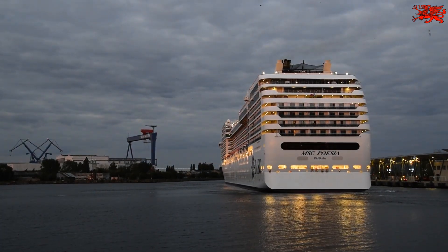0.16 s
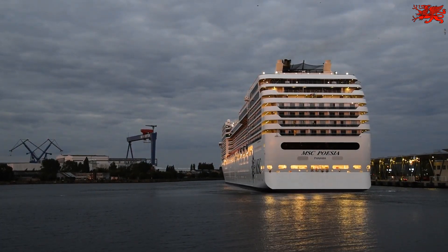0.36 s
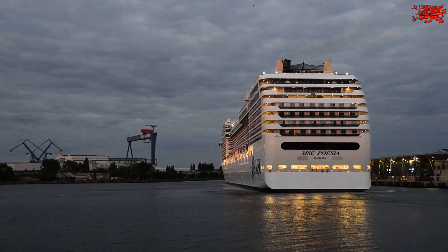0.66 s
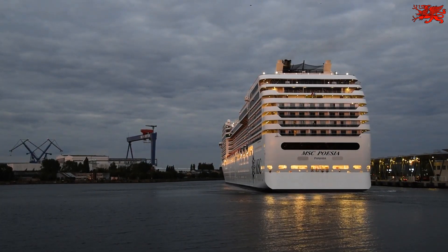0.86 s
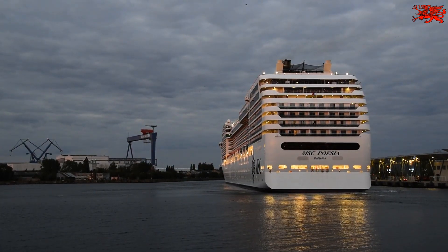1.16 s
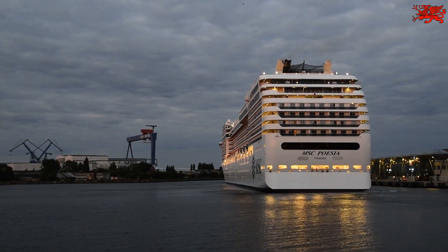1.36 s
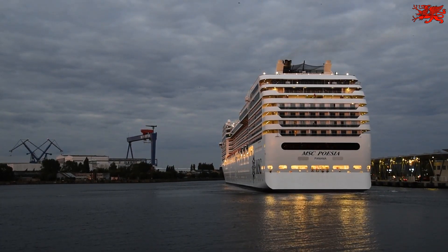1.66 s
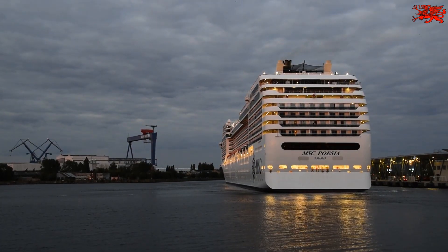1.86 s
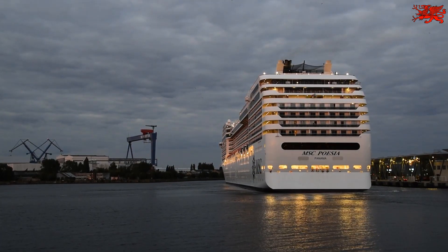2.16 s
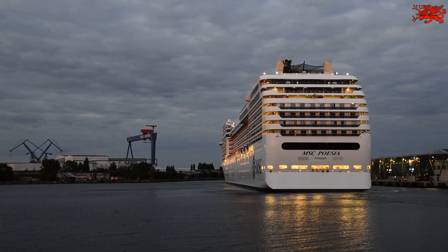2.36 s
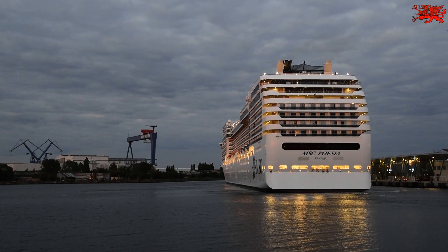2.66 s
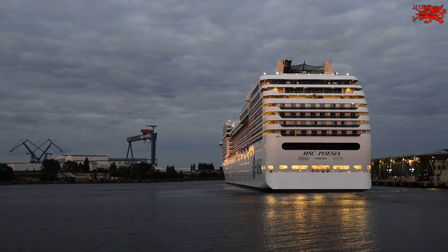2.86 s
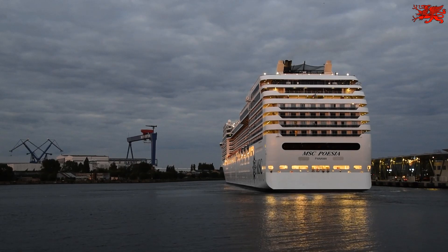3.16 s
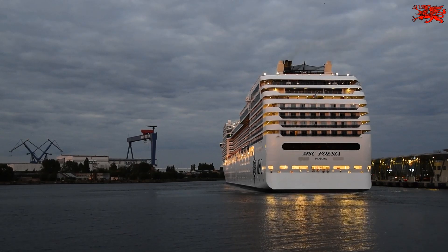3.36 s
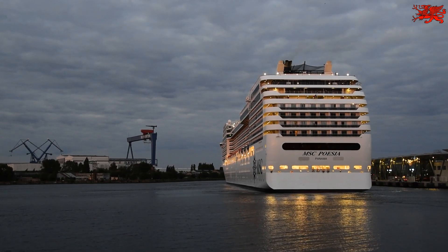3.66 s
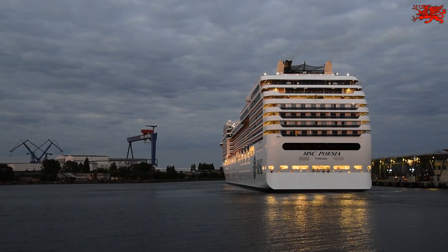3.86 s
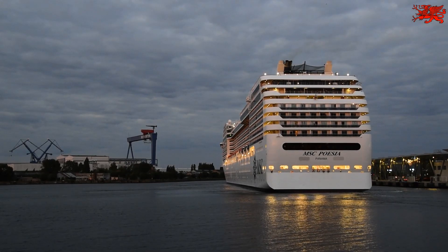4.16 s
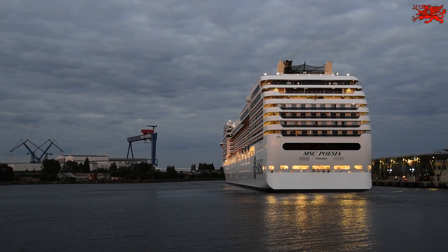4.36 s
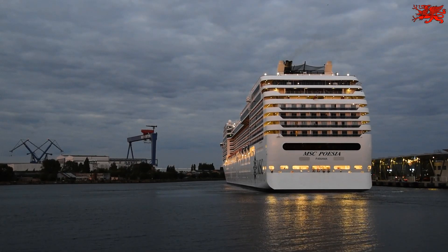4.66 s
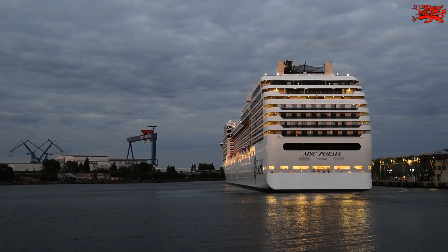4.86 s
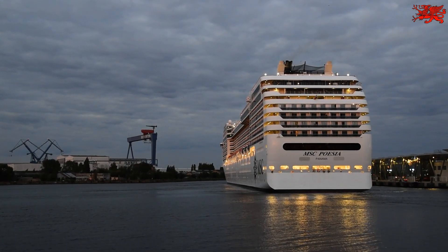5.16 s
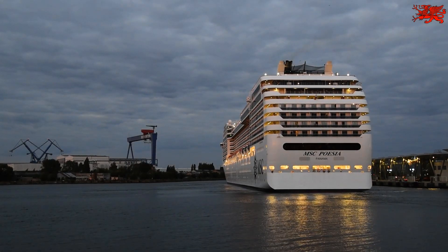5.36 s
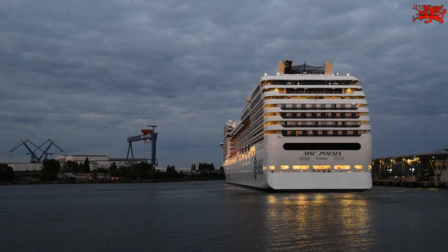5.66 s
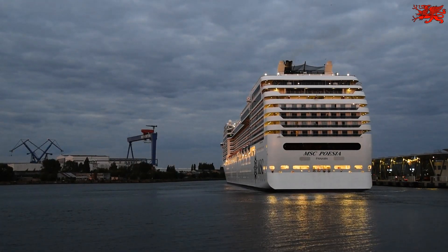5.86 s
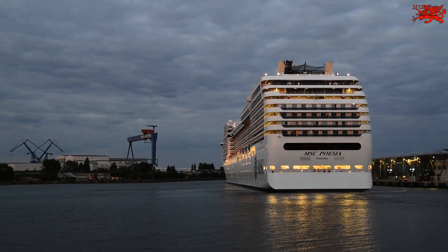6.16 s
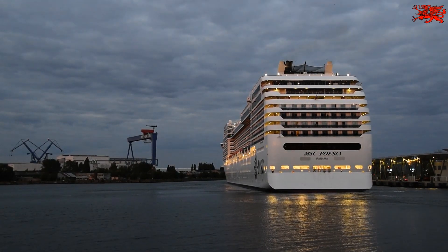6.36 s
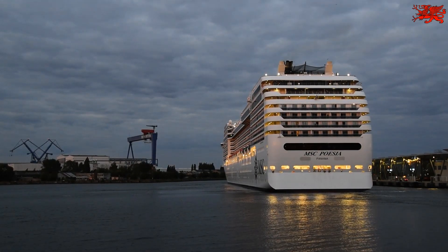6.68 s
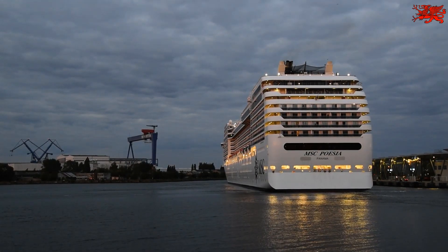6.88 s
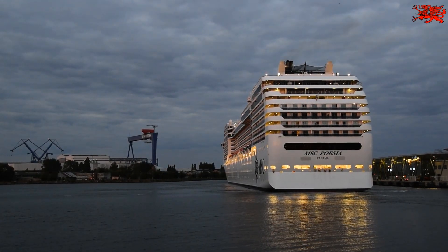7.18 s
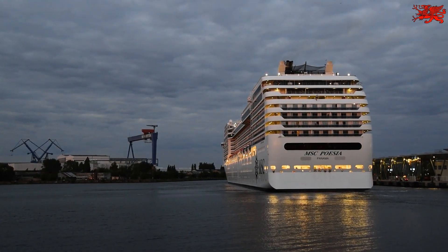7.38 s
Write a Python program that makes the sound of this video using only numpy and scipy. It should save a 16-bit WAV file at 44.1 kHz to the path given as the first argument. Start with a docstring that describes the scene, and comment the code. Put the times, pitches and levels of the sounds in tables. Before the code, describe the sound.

Over a harbour channel, a gull mews repeatedly while a big ship's engines hum and roar, water hisses and wind thumps the microphone.

```python
"""Gull and departing ship

A gull cries six falling notes over a harbour channel while a large ship draws away.
The cries are a few gliding sine waves; the ship is a hum and whining tones over a wide noise roar.
The wake is fading noise with tiny spits, and gusts thump the microphone as low, lumpy noise.
All of it sits in the middle, with a faint side hiss, patchy and unrelated left and right."""
import sys
import numpy as np
from scipy import signal
from scipy.fft import rfft, irfft
from scipy.io import wavfile
from scipy.ndimage import uniform_filter1d

SR = 44100
rng = np.random.default_rng(int(sys.argv[2]) if len(sys.argv) > 2 else 0)


def output_pcm(signal):
    """Save a mono or channel-first signal as 16-bit PCM at the path in sys.argv[1].

    Samples are clipped to [-1, 1] before scaling.
    """
    pcm = np.clip(np.atleast_2d(signal).T, -1, 1) * 32767
    wavfile.write(sys.argv[1], SR, np.round(pcm).astype(np.int16))


N = 331632  # samples, about 7.52 s

# Pitch path of each cry: start_s, length_s, opening_hz, held_hz, hold_s (time until the break), break_s,
# upper_hz, middle_hz, lower_hz (start, middle and end of the slide), last_hz,
# third_db (third partial, before the throat)
CRIES = [(.89, .375, 1720, 1623, 0.073, 0.065, 1445, 1294, 1233, 1110, -46),
         (1.949, 0.41, 1650, 1593, .085, 0.047, 1382, 1310, 1200, 1090, -56),
         (3.168, 0.35, 1643, 1576, 0.065, .065, 1410, 1300, 1150, 1100, -56),
         (4.349, 0.43, 1812, 1650, 0.07, 0.039, 1480, 1319, 1200, 1050, -45),
         (5.319, .32, 1655, 1640, .088, .035, 1458, 1390, 1320, 1153, -54),
         (6.394, 0.39, 1711, 1640, 0.069, 0.028, 1500, 1342, 1188, 1090, -49)]
# Strength of the first two partials of each cry, each fading on its own, one list a cry:
# time_s, first_partial_db, second_partial_db
CRY_STRENGTH = [
    [(.89, -38, -35), (.92, -38, -31.5), (.965, -37, -34), (1.01, -43.5, -40.5), (1.06, -48, -50),
     (1.1, -50, -53), (1.14, -47, -57), (1.18, -52, -70), (1.265, -48, -78)],
    [(1.95, -48, -58), (1.975, -49, -43), (2.02, -42.5, -53), (2.065, -45, -40), (2.085, -48, -49),
     (2.11, -48, -49), (2.14, -55, -62), (2.23, -45, -55), (2.34, -53, -70)],
    [(3.17, -55, -62), (3.19, -45, -50), (3.22, -51, -62), (3.24, -57, -46), (3.29, -46, -53),
     (3.36, -55, -55), (3.4, -55, -70), (3.49, -44.5, -72), (3.53, -49, -72)],
    [(4.348, -47, -46), (4.375, -60, -36.5), (4.4, -42, -38), (4.44, -45.5, -45), (4.49, -52, -58),
     (4.59, -46, -49), (4.66, -50.5, -61), (4.768, -54, -72)],
    [(5.318, -49, -47), (5.35, -45.5, -48.5), (5.405, -44.5, -44), (5.42, -56, -58), (5.44, -47, -50),
     (5.49, -47, -54), (5.54, -66, -50), (5.585, -48, -62), (5.638, -57, -70)],
    [(6.397, -47, -44), (6.43, -40, -52), (6.465, -40, -38.5), (6.5, -47, -51), (6.53, -42, -48),
     (6.59, -58, -55), (6.65, -49, -64), (6.72, -50, -70), (6.797, -50, -76)],
]
# A rising scoop before the first cry and a low note after the third, one list a note: time_s, pitch_hz, level_db
SHORT_NOTES = [
    [(.868, 1090, -53), (.88, 1340, -46), (.895, 1650, -50)],
    [(3.515, 830, -54), (3.53, 810, -48), (3.575, 704, -66)],
]
# What the throat lets through of the third partial: frequency_hz, level_db
THROAT = [(3500, -30), (3850, -15), (4300, -25), (4550, -2.5), (4800, -5), (4950, -5.5), (5100, -26)]
# Reflections of the cries off water and quays: delay_s, level_db
ECHOES = [(0.032, -16), (0.072, -24)]
# Uneven level of the low hum: time_s, level_db
HUM_LEVEL = [(0.0, -43), (0.5, -40), (0.54, -45), (1.4, -40), (1.53, -49), (1.63, -39.5), (1.9, -46.5),
             (2.6, -41.5), (2.76, -44.5), (3.83, -42), (3.92, -58), (4.08, -41.5), (5.17, -52.5),
             (5.23, -48), (5.32, -60), (5.49, -45), (6.09, -51), (6.3, -68), (6.39, -45), (6.58, -51),
             (6.87, -39.5), (6.97, -68), (7.01, -51), (7.29, -46.5), (7.37, -72), (7.52, -50)]
# Weaker machinery tones: pitch_hz
TONES_HZ = [128, 150, 182, 225, 260, 359, 376, 437, 501, 700, 776, 1250, 1303]
# Spread and level of each of those tones: width_hz, first_db, last_db
TONE_SHAPES = [(2.8, -61, -67), (3.3, -65.5, -55.5), (3.3, -55.5, -66.5), (3.4, -57, -71.5),
               (7.1, -63, -68), (6.8, -62.5, -56.5), (8.6, -61.5, -58.5), (5.3, -64.5, -55),
               (7.4, -65, -60), (8.6, -67, -64), (11, -69, -61), (14.6, -62, -59), (5.1, -60, -60)]
# Balance of low and high in the ship's roar: frequency_hz, level_db (per Hz, relative)
ROAR_COLOUR = [(25, -6.5), (60, 10.5), (110, -4.5), (250, -3.5), (450, -5), (800, -7), (1400, -8),
               (1900, -13.5), (3000, -17), (6000, -27), (16000, -77)]
# Level of the roar: time_s, level_db
ROAR_LEVEL = [(0, -46.5), (1.2, -46), (2.5, -47), (3.7, -45.5), (5, -46), (6.2, -44.5), (7.52, -45)]
# Level of the wake's hiss, fading as the ship leaves: time_s, level_db
WAKE_LEVEL = [(0.0, -43.5), (2.6, -48), (3.4, -46.5), (5.4, -47.5), (7.52, -52)]
# Balance of low and high in the wake's hiss: frequency_hz, level_db (per Hz, relative)
WAKE_COLOUR = [(600, -3), (2000, -2), (3500, -1), (5000, 1.5), (6200, 2), (7200, -2.5), (8500, -6.5),
               (10500, -14), (13000, -23.5), (16000, -22.5)]
# Single spits of water: start_s, peak_db
SPITS = [(1.457, -32), (1.5494, -43), (1.7794, -47), (4.5087, -38), (4.935, -37)]
# Level of the wind on the microphone: time_s, level_db
WIND_LEVEL = [(0.0, -53), (0.92, -58), (1.05, -54), (1.07, -47), (1.32, -59), (1.38, -45), (2.18, -56),
              (2.66, -31.5), (2.81, -41), (2.99, -45), (3.27, -35), (3.31, -27), (3.52, -45), (3.56, -32),
              (3.92, -45.5), (3.96, -34), (4.21, -38), (4.25, -47), (5.05, -61), (5.07, -51), (5.51, -64),
              (6.51, -67), (6.85, -57), (6.95, -28.5), (6.99, -35), (7.04, -29.5), (7.23, -45), (7.52, -56)]
# Balance of low and high in the wind: frequency_hz, level_db (per Hz, relative)
WIND_COLOUR = [(8, 7), (18, 6), (30, -5), (45, -9), (70, -13), (120, -35), (300, -67), (2000, -120)]
# Balance of low and high in the faint side hiss: frequency_hz, level_db (per Hz, relative)
SIDE_HISS_COLOUR = [(15, -31), (25, -6), (107, -5), (359, -6.5), (828, -6.5), (3740, -12), (5310, -17),
                    (5760, -18), (14000, -13.5), (15600, -25)]

# the cry settles on its held note, sags, breaks downward, slides on and droops at the end
SETTLE_S, HELD_SAG_HZ_PER_S, DROOP_S = 0.04, 487, 0.07
FLUTTER_DB, FLUTTER_HZ = 1.5, 40  # each partial flutters on its own
HUM_HZ, HUM_WAVER_DB = 75.3, 2.2
SPIT_HZ, SPIT_S = 8600, 0.0005
SIDE_HISS_DB, TOP_EDGE_HZ = -63, 15750


def gull():
    """All cries and short notes, thrown back faintly by water and quays."""
    direct = np.zeros(N)
    for strength, path in zip(CRY_STRENGTH, CRIES):
        start_s = path[0]
        add(direct, start_s, cry(strength, *path))
    for time_s, pitch_hz, level_db in map(np.transpose, SHORT_NOTES):
        t = np.arange(time_s[0], time_s[-1], 1 / SR)
        note = voice(np.interp(t, time_s, pitch_hz), [np.interp(t, time_s, level_db)])
        add(direct, time_s[0], note)
    out = direct.copy()
    for delay_s, level_db in ECHOES:
        add(out, delay_s, gain_of(level_db) * direct)
    return out


def cry(strength, start_s, length_s, opening_hz, held_hz, hold_s, break_s,
        upper_hz, middle_hz, lower_hz, last_hz, third_db):
    """A held note breaks and slides down; the throat shapes its third partial as the pitch falls."""
    t = np.arange(0, length_s, 1 / SR)
    slide_s = hold_s + break_s
    droop_s = length_s - DROOP_S
    sagged_hz = held_hz - HELD_SAG_HZ_PER_S * (hold_s - SETTLE_S)
    pitch_times = [0, SETTLE_S, hold_s, slide_s, (slide_s + droop_s) / 2, droop_s, length_s]
    pitches = [opening_hz, held_hz, sagged_hz, upper_hz, middle_hz, lower_hz, last_hz]
    hz = np.interp(t, pitch_times, pitches)
    time_s, *levels_db = np.transpose(strength)
    partials_db = [np.interp(start_s + t, time_s, db) for db in levels_db]
    partials_db.append(third_db + read(THROAT, 3 * hz))
    return voice(hz, partials_db)


def voice(hz, partials_db):
    """Clean partials, whole multiples of one gliding pitch, tremble slightly in pitch and strength."""
    t = np.arange(len(hz)) / SR
    trembling_hz = hz * (1 + 0.0043 * drift(len(t), hz=40))
    turns = np.cumsum(trembling_hz) / SR  # cycles completed so far
    sound = np.zeros(len(t))
    for number, db in enumerate(partials_db, start=1):
        strength = gain_of(db + FLUTTER_DB * drift(len(t), FLUTTER_HZ))
        sound += strength * np.sin(2 * np.pi * number * turns)
    fade_in = np.clip(t / 0.0042, 0, 1)
    fade_out = np.clip((t[-1] - t) / 0.0043, 0, 1)
    return np.sqrt(2) * sound * fade_in * fade_out


def ship():
    """Engines give a strong hum and machinery gives wavering narrow tones, over a wide roar."""
    t = np.arange(N) / SR
    hum_gain = np.sqrt(2) * follow(HUM_LEVEL) * gain_of(HUM_WAVER_DB * drift(N, hz=3.5))
    hum = hum_gain * np.sin(2 * np.pi * HUM_HZ * t + 0.17 * drift(N, hz=6.4))
    roar = follow(ROAR_LEVEL) * noise(ROAR_COLOUR, patchy_db=0.56, flicker_db=-0.24)
    out = hum + roar
    for hz, (width_hz, first_db, last_db) in zip(TONES_HZ, TONE_SHAPES):
        # a tone whose strength and phase wander fills a narrow band
        strength = gain_of(3.5 * drift(N, width_hz / 2))
        tone = strength * np.sin(2 * np.pi * hz * t + 1.45 * drift(N, width_hz / 2))
        out += gain_of(np.linspace(first_db, last_db, N)) * tone
    return out


def wake():
    """Bursting foam makes a dense hiss, with a few spits standing out."""
    out = follow(WAKE_LEVEL) * noise(WAKE_COLOUR, patchy_db=0.56, flicker_db=0.8)
    for start_s, peak_db in SPITS:
        add(out, start_s, spit(peak_db, SPIT_HZ))
    return out


def spit(peak_db, hz):
    """A tiny bubble bursts: a few cycles with a soft start and end."""
    shape = np.hanning(round(SPIT_S * SR))
    t = np.arange(len(shape)) / SR
    return gain_of(peak_db) * shape * np.sin(2 * np.pi * hz * t)


def wind():
    """Gusts push on the microphone as lumpy, low pressure swings."""
    hz = np.fft.rfftfreq(N, 1 / SR)
    spectrum = rfft(rng.standard_normal(N)) * gain_of(read(WIND_COLOUR, hz))
    swings = evened(irfft(spectrum, N))
    # even out the chance swells, so that the level curve sets the gusts
    power = uniform_filter1d(uniform_filter1d(swings ** 2, size=5000), size=5000)
    return follow(WIND_LEVEL) * swings / np.sqrt(power + 0.089)


def noise(colour, patchy_db, flicker_db):
    """Random short-time spectra with drifting patches and a flicker shared by wide bands."""
    frames = N // 256 + 5
    hz = np.fft.rfftfreq(1024, 1 / SR)
    # four random grids: rows are frequencies, columns are moments
    real, imaginary, patches, flicker = rng.standard_normal((frames, 513, 4)).T
    patches = evened(smooth_grid(patches, bands=14, moments=16))
    flicker = evened(smooth_grid(flicker, bands=160, moments=3))
    level_db = read(colour, hz)[:, None] + patchy_db * patches + flicker_db * flicker
    spectra = (real + 1j * imaginary) * gain_of(level_db)
    return evened(signal.istft(spectra, nperseg=1024, noverlap=768)[1][:N])


def smooth_grid(grid, bands, moments):
    """Averages neighbours across frequency, then across time."""
    return uniform_filter1d(uniform_filter1d(grid, size=bands, axis=0), size=moments, axis=1)


def drift(count, hz):
    """Slow chance of rms 1 that changes about hz times a second."""
    r = np.exp(-2 * np.pi * hz / SR)
    lead = SR  # lets the filter settle
    x = rng.standard_normal(count + lead)
    two_smoothers = np.convolve([1, -r], [1, -r])
    return evened(signal.lfilter([1], two_smoothers, x)[lead:])


def follow(curve):
    """Reads a level curve at every sample, as amplitude."""
    time_s, level_db = np.transpose(curve)
    return gain_of(np.interp(np.arange(N) / SR, time_s, level_db))


def read(points, hz):
    """Reads a spectrum on a log-frequency axis."""
    f, value = np.transpose(points)
    return np.interp(np.log(hz + 1), np.log(f + 1), value)


def gain_of(db):
    """Decibels to amplitude."""
    return 10 ** (np.asarray(db) / 20)


def evened(x):
    """Scales to rms 1 (rms is a kind of average strength)."""
    return x / np.sqrt(np.mean(x ** 2) + 1e-20)


def add(mix, start_s, sound):
    """Mixes a sound in at start_s seconds, cutting off what runs past the end."""
    part = mix[round(start_s * SR):][:len(sound)]
    part += sound[:len(part)]


def scene():
    """Everything arrives in the middle: the same sound left and right."""
    return np.tile(gull() + ship() + wake() + wind(), (2, 1))


def record(dry):
    """Adds a faint side hiss, patchy and unrelated left and right, then cuts the top treble."""
    side_hiss = np.array([noise(SIDE_HISS_COLOUR, patchy_db=4.0, flicker_db=6.0) for _ in dry])
    wet = dry + gain_of(SIDE_HISS_DB) * side_hiss
    low_pass = signal.firwin(1023, TOP_EDGE_HZ, window=("kaiser", 9), fs=SR)
    return signal.oaconvolve(wet, low_pass[None], "same")


dry = scene()
out = record(dry)
output_pcm(out)
```